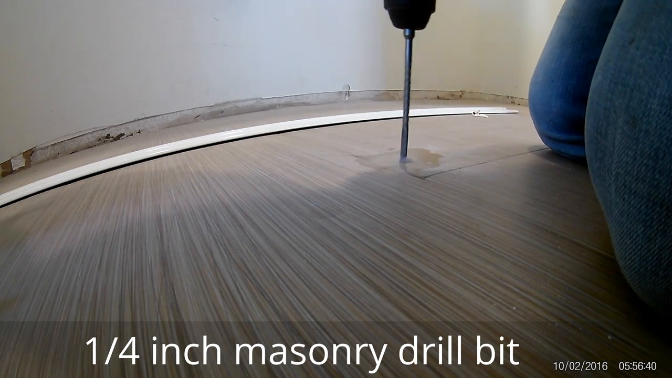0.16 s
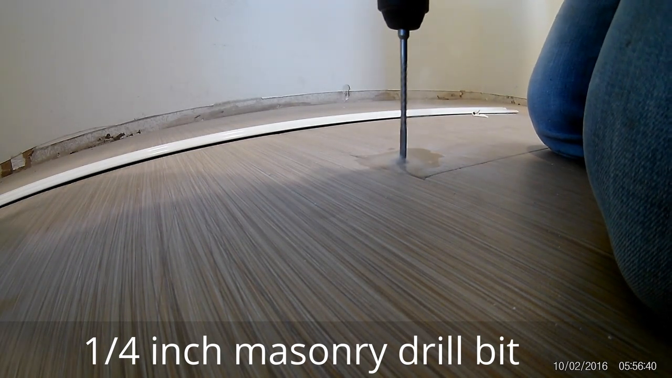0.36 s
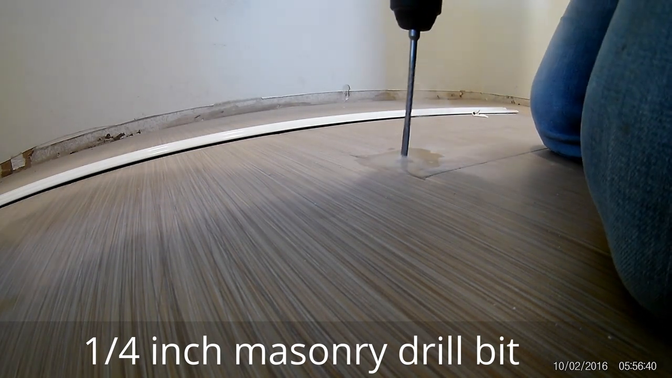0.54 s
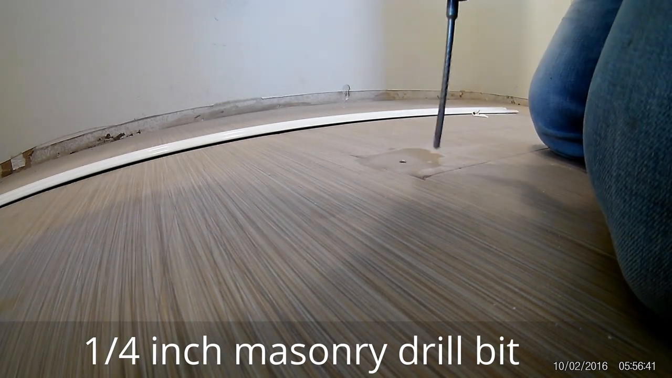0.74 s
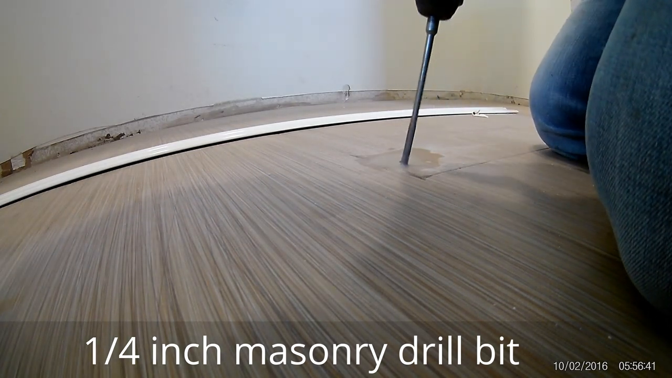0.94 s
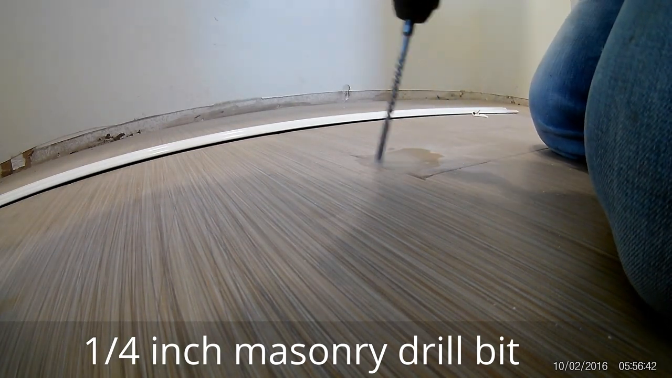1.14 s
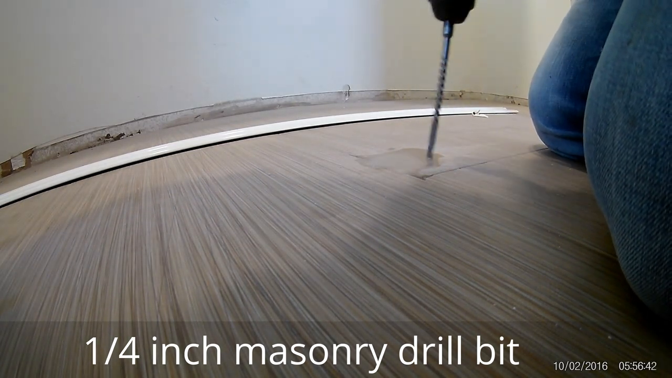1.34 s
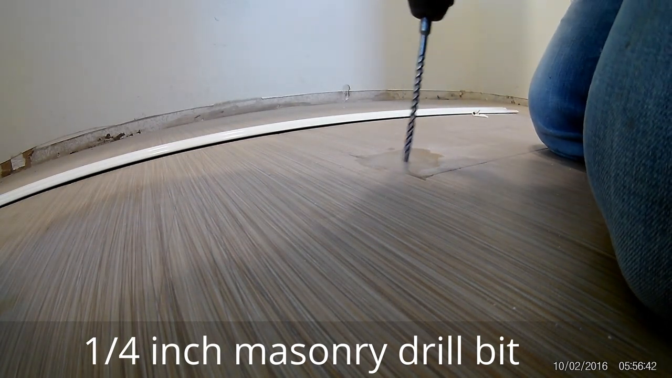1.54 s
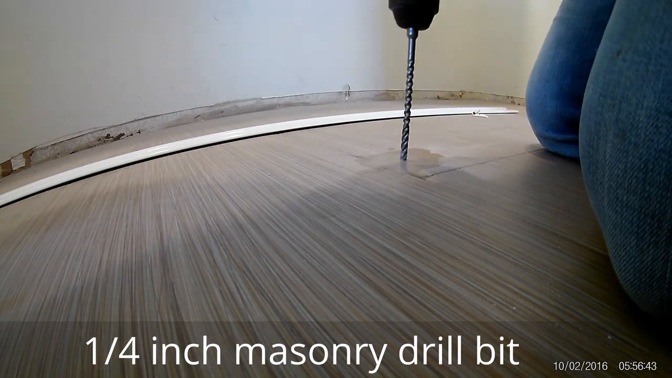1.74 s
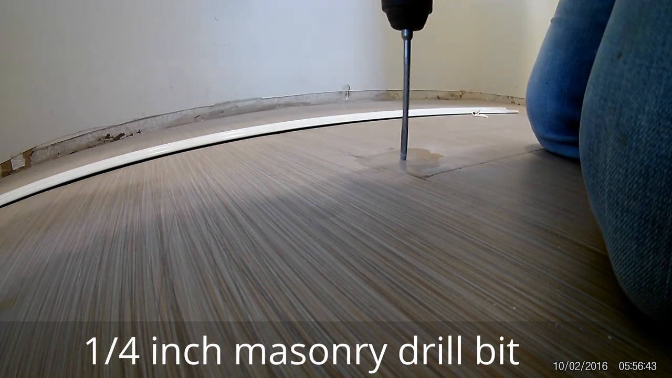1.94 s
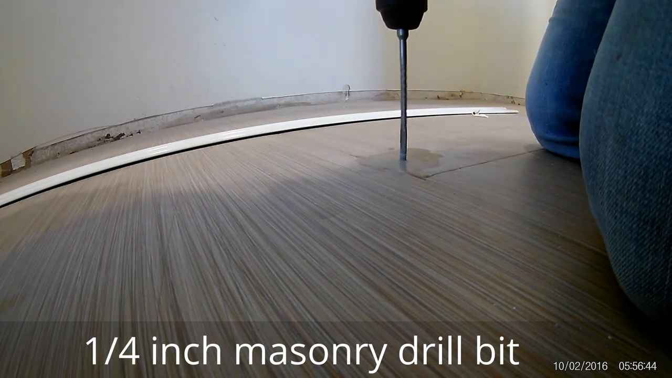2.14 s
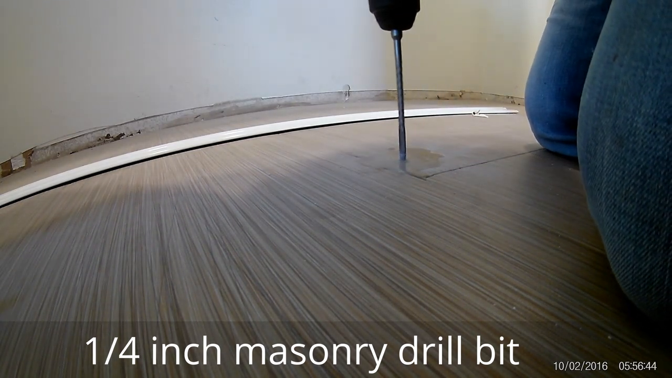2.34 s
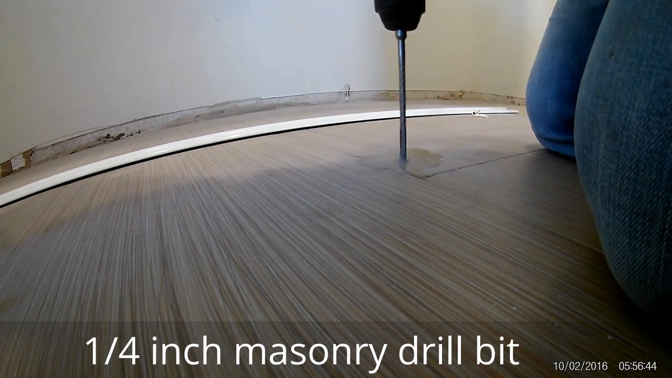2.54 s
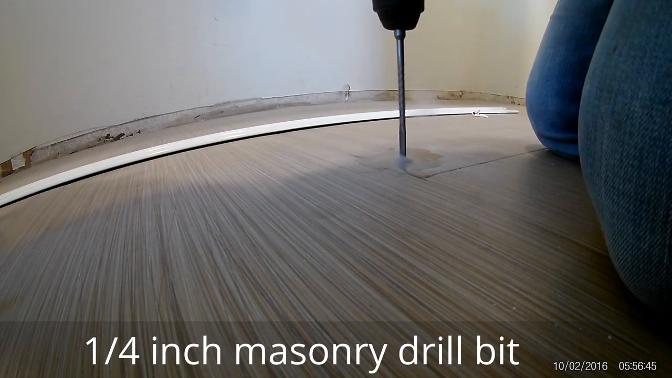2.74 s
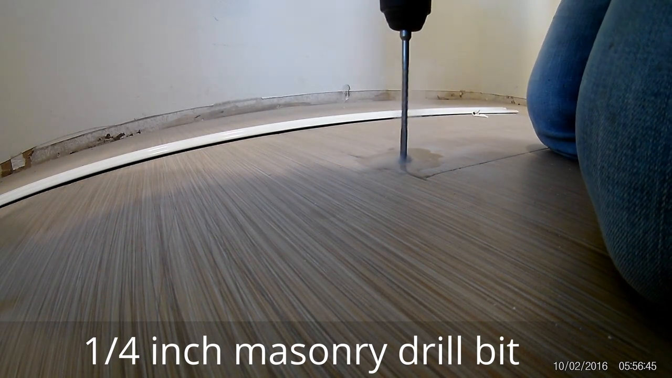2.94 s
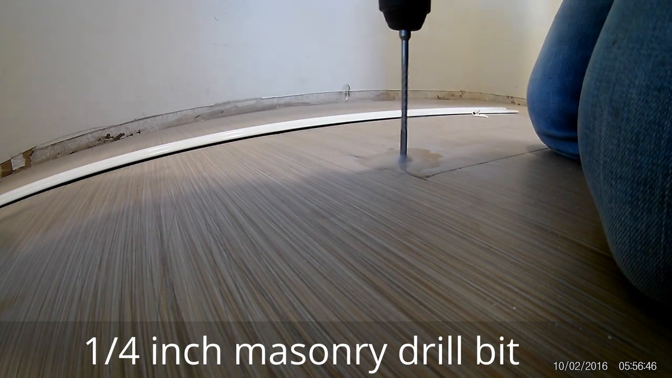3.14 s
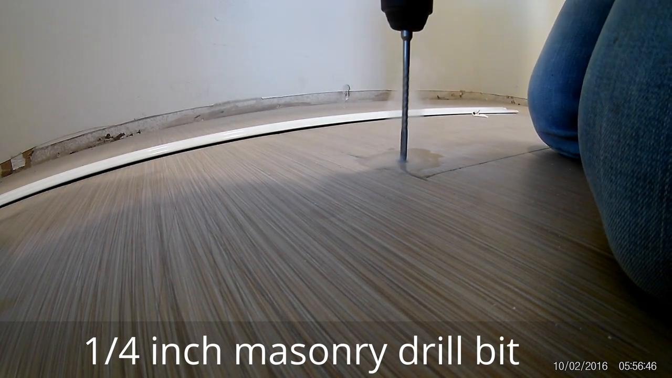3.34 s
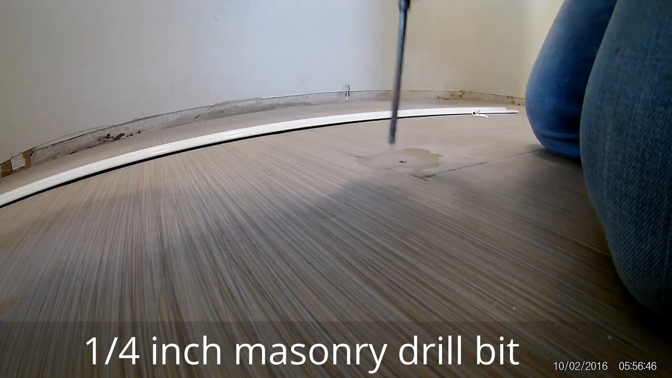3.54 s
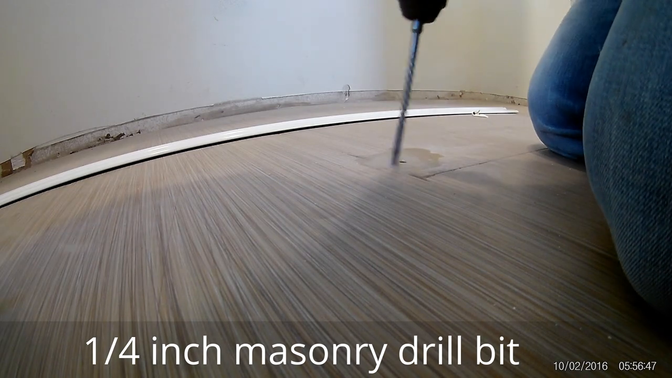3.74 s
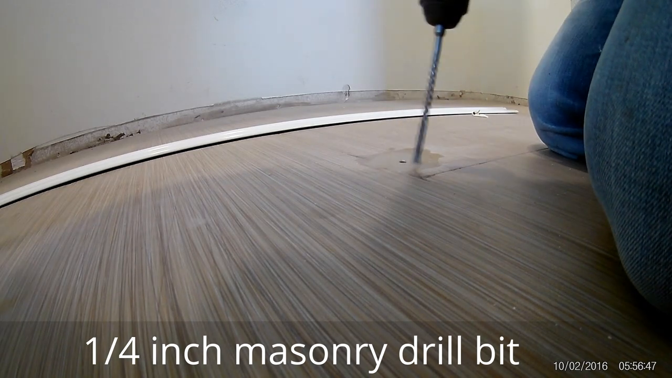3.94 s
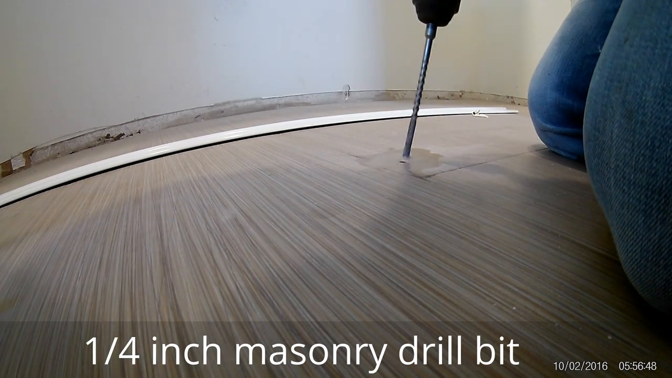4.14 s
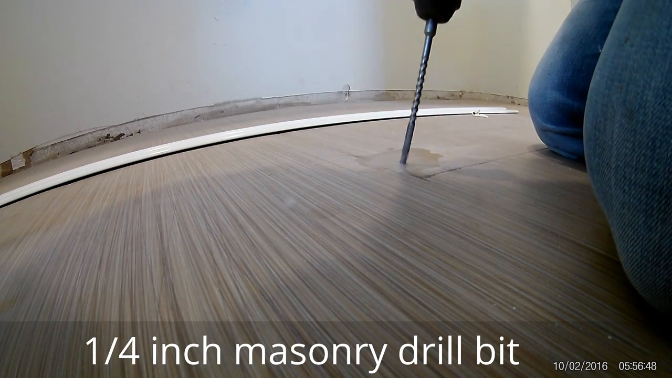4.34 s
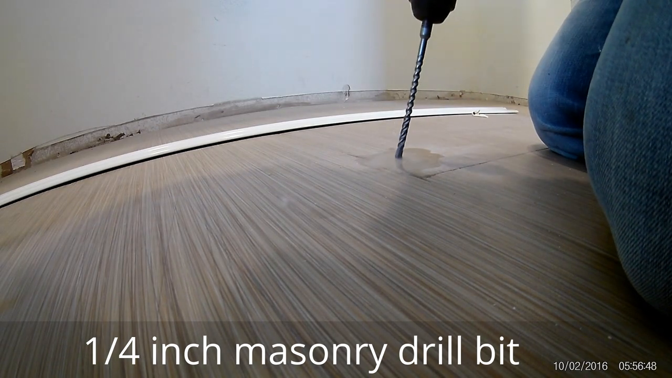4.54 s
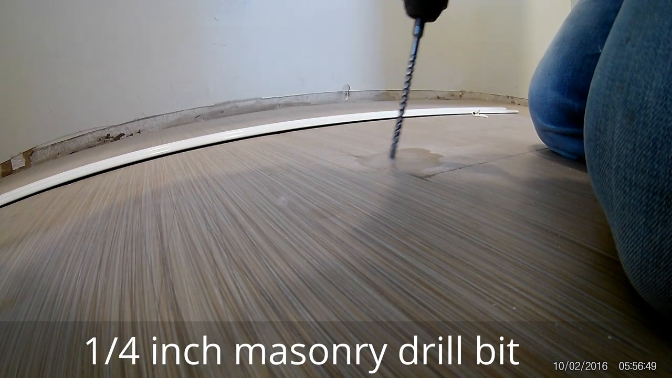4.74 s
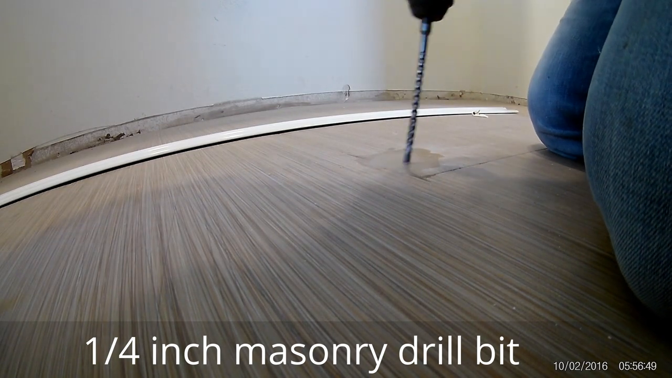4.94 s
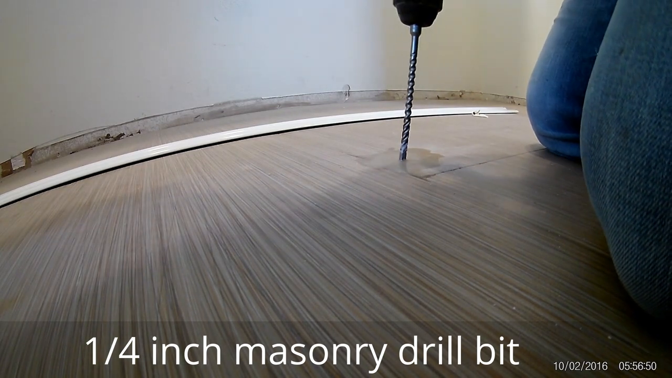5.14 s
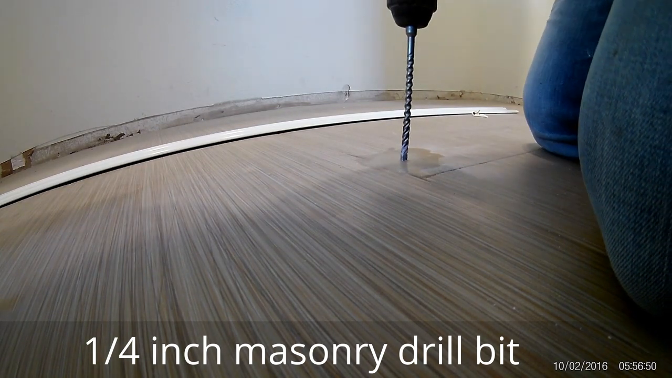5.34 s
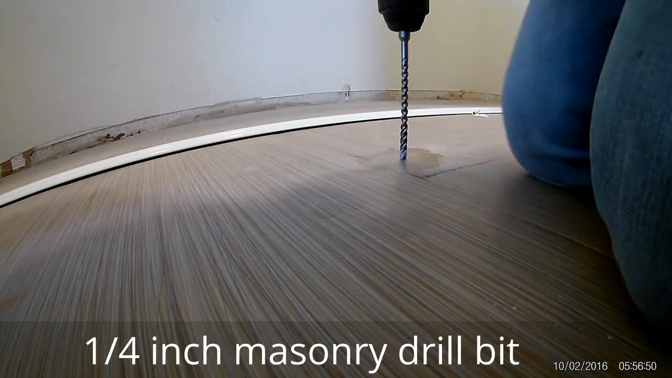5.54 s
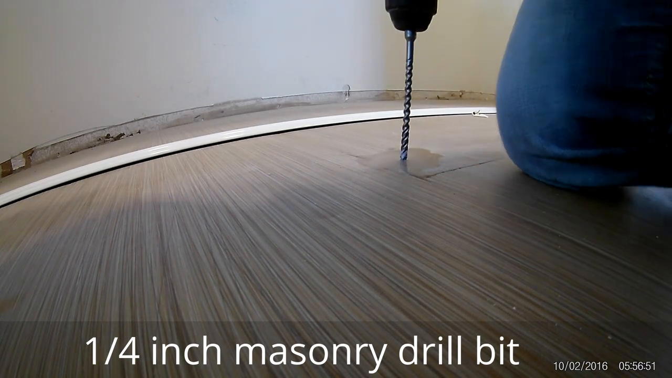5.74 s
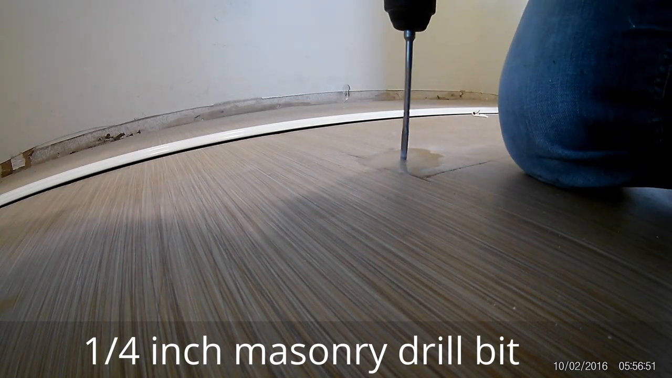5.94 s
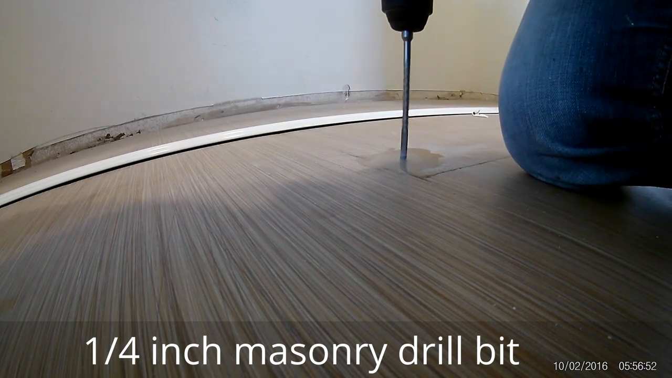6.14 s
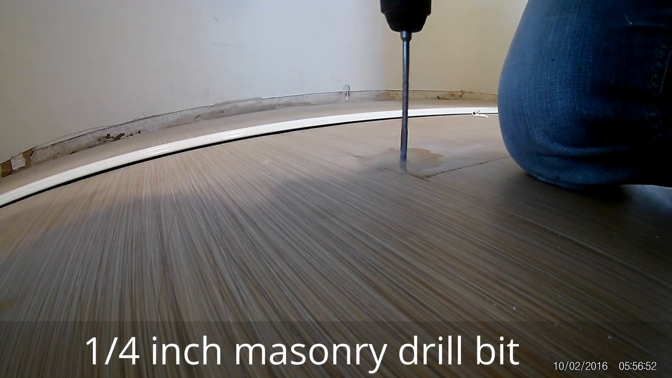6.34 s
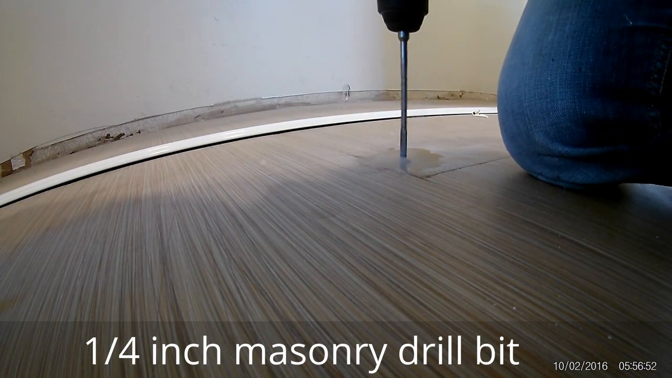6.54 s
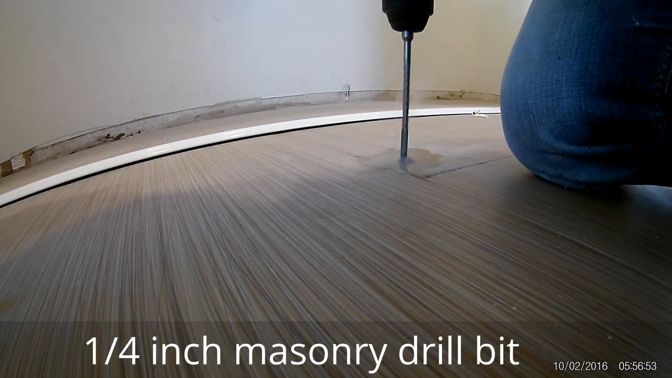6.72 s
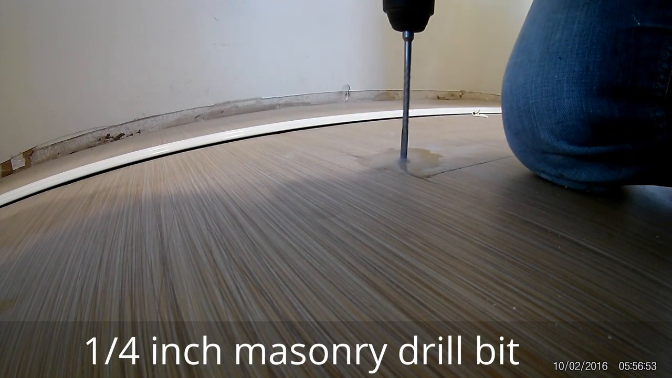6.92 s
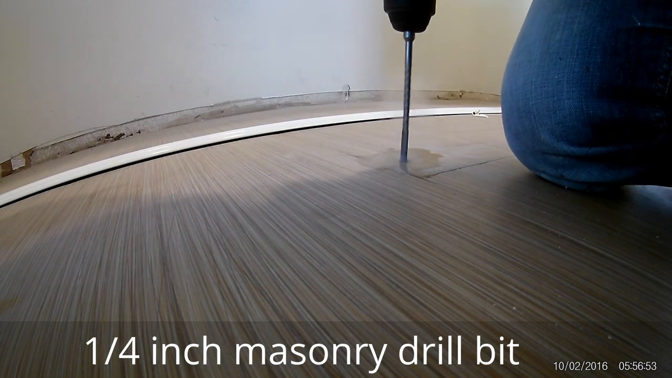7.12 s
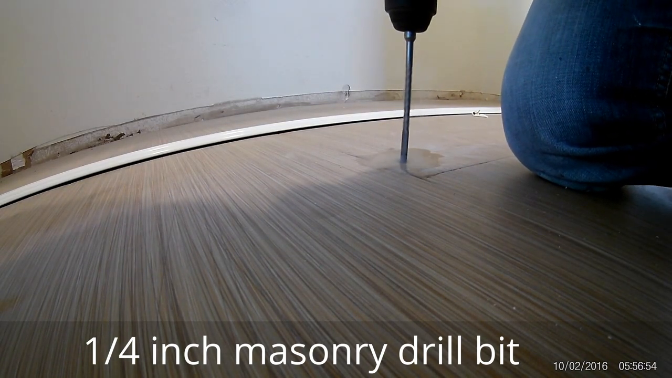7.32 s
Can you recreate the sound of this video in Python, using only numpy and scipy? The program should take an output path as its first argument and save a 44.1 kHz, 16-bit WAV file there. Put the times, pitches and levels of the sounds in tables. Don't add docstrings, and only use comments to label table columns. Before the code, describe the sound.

Three bursts of masonry drilling on hard tile, heard close from floor level in a bare room. Each burst is a harsh, steady whine over rapid buzzing and crushed grit. Between them the motor sinks in pitch with a faint fan whistle, while the freed bit drags, clacks and knocks on the tile. The last burst is heaviest and continues to the end.

```python
import sys
import numpy as np
from scipy import signal
from scipy.fft import rfft, irfft
from scipy.io import wavfile

SR = 44100
rng = np.random.default_rng(int(sys.argv[2]) if len(sys.argv) > 2 else 0)


def natural_amplitude(level_db):
    exponent = np.asarray(level_db, float) / 20
    return 10 ** exponent


def generate_wav(sig):
    pcm = np.round(np.clip(np.atleast_2d(sig).T, -1, 1) * 32767).astype(np.int16)
    wavfile.write(sys.argv[1], SR, pcm)


N = 325444
MESH_PER_BITE = 43.37
RUN_HZ = 4350


def rms_one(x):
    return x / np.sqrt(np.mean(x ** 2) + 1e-20)


def in_time(rows):
    s, *columns = np.transpose(rows)
    return [np.interp(np.arange(N) / SR, s, c) for c in columns]


def at_speed(rows, hz):
    speed, *columns = np.transpose(rows)
    return [np.interp(hz, speed, c) for c in columns]


def drift(rate_hz):
    knots = rng.standard_normal(int(N / SR * 40) + 2)
    r = np.exp(-2 * np.pi * min(rate_hz, 15) / 40)
    smooth = rms_one(signal.lfilter([1], [1, -r], knots))
    return np.interp(np.arange(N) / SR * 40, np.arange(len(knots)), smooth)


def swell_db(hz, centre_hz, half_width_hz, db):
    return db / (1 + ((hz - centre_hz) / half_width_hz) ** 2)


def colour(x, spectrum, peaks=()):
    hz = np.maximum(np.fft.rfftfreq(N, 1 / SR), 1)
    curve_hz, curve_db = np.transpose(spectrum)
    gain = natural_amplitude(np.interp(np.log(hz), np.log(curve_hz), curve_db, left=-90, right=-90))
    for top_hz, width_hz, db in peaks:
        gain = gain * natural_amplitude(swell_db(hz, top_hz, width_hz / 2, db))
    return rms_one(irfft(rfft(x) * gain, N))


def band(x, low_hz, high_hz):
    return signal.sosfilt(signal.butter(3, [low_hz, high_hz], "band", fs=SR, output="sos"), x)


def ring(clicks, hz, t60):
    r, w = natural_amplitude(-60 / (t60 * SR)), 2 * np.pi * hz / SR
    return signal.lfilter([0, np.sin(w)], [1, -2 * r * np.cos(w), r * r], clicks + 1e-18)


# start_s, gear_mesh_hz, floor_weight_db, sideways_lean_db, tip_push_db
BURSTS = [
    [(0.0, 4370, -42, -18, -25), (0.224, 4400, -37, -22.5, -28), (0.406, 4372, -53, -31.5, -33),
     (0.474, 4330, -56, -20, -29), (0.562, 4340, -39, -17, -28), (0.58, 4270, -41, -29, -38)],
    [(1.95, 2704, -52, -44, -32), (2.068, 4150, -52, -20, -37), (2.18, 4430, -38, -25, -27),
     (2.272, 4500, -37, -17, -26), (2.604, 4387, -28, -26, -30), (2.868, 4290, -30, -31, -27),
     (3.02, 4322, -27, -30, -28), (3.16, 4264, -29, -19, -25), (3.495, 4210, -29, -21, -25)],
    [(5.896, 2950, -50, -50, -28), (5.988, 3947, -28, -21, -21), (6.088, 3365, -29, -37, -27),
     (6.222, 4290, -27, -23, -34), (6.39, 4490, -22, -19, -21), (6.66, 4440, -23, -18, -23),
     (6.85, 4362, -25, -30, -17), (6.964, 4360, -27, -17, -17.5), (7.38, 4343, -28, -23, -17)],
]
PRESS_S = [
    1.893,
    5.825,
]


def motor():
    t, hz = np.arange(N) / SR, in_time(sum(BURSTS, []))[0]
    coast_s, drag_hz = 1.2, 1700
    load_rows = [(0, 1)]
    for held, press, after in zip(BURSTS, PRESS_S, BURSTS[1:]):
        release, top_hz = held[-1][:2]
        up, up_hz = after[0][:2]

        def coast(s):
            return np.maximum((top_hz + drag_hz) * np.exp((release - s) / coast_s) - drag_hz, 1)

        off = (t > release) & (t < up)
        climb = np.interp(t[off], [press, up], [max(coast(press), 300), up_hz])
        hz[off] = np.where(t[off] < press, coast(t[off]), climb)
        load_rows += [(release, 1), (release + .05, 0), (press, 0), (press + .02, 1)]
    return 2 * np.pi * np.cumsum(hz) / SR, hz, in_time(load_rows)[0]


def driven(hz, load):
    return np.sqrt(2) * load ** 2 * natural_amplitude(-40 * np.clip(1 - hz / 2900, 0, 1))


def second_order_db():
    seated_db = -42
    rows = []
    for s in PRESS_S:
        rows += [(s, -50), (s + .12, -30), (s + .9, seated_db)]
    for held in BURSTS[:-1]:
        rows += [(held[-1][0] - .1, seated_db), (held[-1][0] + .02, -29)]
    return in_time(sorted(rows))[0] + 3.0 * drift(5)


# start_s, rise_s, level_db
UNEVEN = [
    (.1, .35, -36),
    (2.5, .4, -36),
    (5.9, 1.1, -39),
]


def uneven_db():
    rows = []
    for s, rise, db in UNEVEN:
        rows += [(s, -54), (s + rise, db), (s + rise + .7, db - 3)]
    return in_time(rows)[0]


# multiple_of_bite, level_db
UPPER_ORDERS = [(5, -5), (6, -5.5), (7, -2.5), (8, -1), (9, -9.5), (10, -9.5), (11, -6), (12, -23),
                (13, -29), (14, -20), (15, -6), (16, -39), (19, -10), (20, -5)]


def bites(mesh, hz, load):
    _, weight_db, lean_db, push_db = in_time(sum(BURSTS, []))
    bite, bite_hz = mesh / MESH_PER_BITE, hz / MESH_PER_BITE
    fourth_db = (lean_db + push_db) / 2 - 4.5 + 2.2 * drift(5)
    fourth_db += swell_db(4 * bite_hz, 408, 11, 8) + swell_db(4 * bite_hz, 320, 22, 13)
    orders = [(1, weight_db), (2, second_order_db()), (3, lean_db + 1.5 * drift(6)), (4, fourth_db)]
    orders += [(1.5, uneven_db())]
    for k, db in UPPER_ORDERS:
        boom_db = swell_db(k * bite_hz, 740, 70, 11) + swell_db(k * bite_hz, 415, 30, 12) - 7
        orders.append((k, push_db + db + 4.35 * drift(13) + boom_db))
    out = 0
    for k, db in orders:
        angle = bite + 0.087 * drift(8.5)
        out = out + natural_amplitude(db) * np.sin(k * angle + rng.uniform(0, 7.3))
    return driven(hz, load) * out


# multiple_of_mesh, level_db
GEAR_ORDERS = [(1 / 5, -1), (1, 0), (13 / 12, -16), (14 / 12, -14), (6 / 5, -17), (15 / 12, -14),
               (17 / 12, -22), (2, -21)]


def gear_whine(mesh, hz, load):
    push_db = in_time(sum(BURSTS, []))[3]
    case_db = -32 + swell_db(hz, 4378, 75, 11)
    side_db = -22 + 40 * np.log10(hz / RUN_HZ)
    out = 0
    for k, db in GEAR_ORDERS:
        level_db = case_db if k <= 1 else side_db
        if k < 1:
            level_db = level_db + .45 * (push_db + 22)
        out = out + natural_amplitude(level_db + db + 2.4 * drift(7)) * np.sin(k * mesh + 0.053 * drift(4.3))
    return driven(hz, load) * out


# level_db, slope_db_per_db_of_speed
POWERED = [
    (-21.5, 1.2),
    (-14, 1.2),
    (-24, 1.6),
]
# gear_mesh_hz, floor_drumming_db, grind_db, hiss_db
IDLING = [(0, -62, -62, -78), (250, -52, -50, -70), (500, -50, -43, -55), (750, -49, -36, -49),
          (1300, -42, -29.5, -43), (2200, -39, -26.5, -37.5), (3200, -37, -22, -32.5),
          (4200, -33, -18, -27.5)]
# start_s, hold_s, grind_db, floor_drumming_db, hiss_db
SCUFFS = [(1.1, .015, -25, -31, -52), (1.135, .01, -21.5, -29, -50), (1.29, .07, -31, -41, -52),
          (1.19, .01, -24, -32, -50), (1.405, .015, -25, -33, -52), (1.5, .07, -33, -38, -55),
          (1.6, .015, -29, -35, -55), (1.698, .01, -33, -19, -52), (1.72, .01, -23, -21, -44),
          (1.77, .04, -42, -27, -56), (3.745, .01, -18, -24, -45), (3.83, .15, -27, -32, -48),
          (4.15, .06, -27, -32, -48), (4.53, .01, -27, -41, -52), (4.58, .08, -30, -35, -55),
          (4.72, .005, -35, -45, -56), (4.795, .05, -38, -47, -67), (4.92, .06, -21.5, -30, -49),
          (5.062, .015, -26, -34, -47), (5.236, .005, -36, -21, -55), (5.3, .06, -46, -34, -64),
          (5.45, .1, -45, -59, -72), (5.615, .01, -49, -58, -52), (5.74, .04, -52, -54, -65)]


def contact(hz, load):
    t = np.arange(N) / SR
    speed_db = 20 * np.log10(hz / RUN_HZ)
    power = []
    for (db, slope), idle_db in zip(POWERED, at_speed(IDLING, hz)):
        power.append(natural_amplitude(load * (db + slope * speed_db) + (1 - load) * idle_db) ** 2)
    for s, hold, grind_db, drum_db, hiss_db in SCUFFS:
        near = slice(round((s - .1) * SR), round((s + hold + .2) * SR))
        rise_db, fall_db = 700 * (t[near] - s), 320 * (s + hold - t[near])
        shape = natural_amplitude(np.minimum(np.minimum(rise_db, fall_db), 0))
        for layer, db in zip(power, (drum_db, grind_db, hiss_db)):
            layer[near] += (natural_amplitude(db) * shape) ** 2
    return [10 * np.log10(layer) for layer in power]


# pitch_hz, level_db (per Hz)
DRUMMING = [(71, -49), (120, -17), (222, -16), (317, -4.5), (611, -7), (779, -10), (993, -3.5),
            (1310, -1.5), (1500, 0), (1950, -33), (3300, -120)]
# pitch_hz, level_db (per Hz)
GRIND = [(710, -33), (1200, -5.5), (1550, -9), (1700, 0), (1840, -2.5), (2170, -1.5), (2720, -4),
         (3210, -5.5), (3980, -12.5), (5000, -26.5), (6500, -19.5), (11000, -120)]
# pitch_hz, level_db (per Hz)
HISS = [(2710, -21), (4600, 1.5), (5160, 1.5), (6200, -6), (7380, 1.5), (8960, 0.5), (11200, -6.5),
        (12800, -7.5), (13600, -15), (15100, -21)]
# pitch_hz, width_hz, lift_db
BODY = [(413.4, 13, 11.5), (744, 158, 16), (1300, 27, 1), (1657, 43, 7), (1990, 220, 4.5), (2590, 99, 2.5),
        (4350, 57, 5), (5050, 68, 4), (8650, 400, 1.5)]


def grinding(mesh, hz, load):
    drum_db, grind_db, hiss_db = contact(hz, load)
    swell = natural_amplitude(0.6 * load * np.cos(mesh / MESH_PER_BITE) + 0.9 * (0.5 - load) * drift(5))
    born = rng.random(N) < 700 * natural_amplitude(4 * drift(12)) / SR
    sizes = natural_amplitude(3.14 * np.minimum(rng.exponential(1, N), 2.8))
    grains = rms_one(born * sizes * rng.choice([-1, 1], N))
    turns = np.floor(mesh / MESH_PER_BITE / (2 * np.pi) + .06 * drift(15))
    blows = rms_one((np.diff(turns, prepend=0) > 0) * natural_amplitude(1.3 * rng.standard_normal(N)))
    chips = rms_one(signal.lfilter([1], [1, -.985], blows) * rng.standard_normal(N))
    rough = (1.2 - 0.48 * load) * grains + .7 * load * chips
    out = 0
    for level_db, spectrum, grit in ((drum_db + 1, DRUMMING, .4), (grind_db, GRIND, .6), (hiss_db, HISS, .3)):
        force = rng.standard_normal(N) + grit * rough
        out = out + natural_amplitude(level_db) * colour(force, spectrum, BODY)
    dull = signal.lfilter(*signal.butter(1, 15000, fs=SR), out)
    out = load * out + (1 - load) * dull
    shank = 0
    for mode_hz, db in ((4510, -20.5), (2000, -21), (1444, -13)):
        shank = shank + rms_one(ring(grains, mode_hz, 0.041)) * natural_amplitude(db)
    return (out + (1 - load) * natural_amplitude(grind_db) * shank) * swell


# pitch_hz, level_db (per Hz)
ROOM_TONE = [(15, -38), (25, -5), (84, 1.5), (375, -12), (571, -6), (630, -29), (1320, -72), (2970, -14),
             (3360, -13), (9000, -59), (11700, -71), (19800, -120)]


def room_tone():
    return natural_amplitude(-50) * colour(rng.standard_normal(N), ROOM_TONE)


# gear_mesh_hz, shaft_tone_db, fan_whistle_db
COAST_TONES = [(250, -99, -99), (1150, -58, -50), (1880, -57, -49), (2050, -40, -50), (2600, -43, -52),
               (3300, -39, -55), (3800, -28, -59), (4200, -34, -60)]
# multiple_of_mesh, level_db
FAN_ORDERS = [(3, -2.5), (4.6, -7), (6, -15), (7.5, -18)]


def coasting(mesh, hz, load):
    shaft_db, fan_db = at_speed(COAST_TONES, hz)
    fan = 0
    for k, db in FAN_ORDERS:
        fan = fan + natural_amplitude(db + 4.0 * drift(7.96)) * np.sin(k * (mesh + .3 * drift(15)))
    in_range = np.gradient(mesh) * 7.6 < np.pi
    shaft = natural_amplitude(shaft_db + 2.5 * drift(12)) * np.sin(mesh / 5)
    return np.sqrt(2) * (1 - load) * (shaft + in_range * natural_amplitude(fan_db) * fan)


# start_s, peak_db, low_thump_db, floor_knock_db, tile_pitch_hz
TAPS = [(1.683, -10.5, -21, -18, 1990), (1.693, -16, -24, -1.5, 1170), (1.708, -9, -33, -43, 710),
        (1.722, -16, -31, -11, 791), (1.748, -15.5, -31, -7, 794), (1.783, -5.5, -32, -25, 1960),
        (5.199, -7.5, -21, -14, 2000), (5.232, -10, -20, -24, 1220), (5.305, -9, -15, -12, 762),
        (5.397, -22, -30, -30, 1780), (5.4, -1, -17, -10, 1780), (5.406, -6, -20, -8, 700),
        (5.543, -33, 4, -20, 1290), (5.727, -25.5, 5.5, 2, 1885)]
# start_s, peak_db, steel_tick_db, tile_pitch_hz
CLACKS = [(1.603, -16.5, -20, 1730), (3.754, -6.5, -23, 1720), (3.975, -9.5, -21, 2075),
          (4.213, -9, -15, 670), (4.298, -20, -21, 1310), (4.517, -13, -24, 1960), (4.597, -20, -23, 2020),
          (4.711, -19, -19, 1910), (4.788, -22, -13, 2000), (4.883, -25, -20, 2000),
          (4.912, -13, -23, 2000), (4.966, -10, -29, 2030), (5.83, -18, -8, 713), (5.87, -13, -5, 2210)]
# pitch_hz, level_db, t60_s
THUMP_MODES = [(75, -6, 0.14), (92, -2, 0.12), (142, 4.5, 0.14)]
# pitch_hz, level_db, t60_s
STEEL_MODES = [(4470, -3, .03), (5150, 0, .025), (7600, -6, .015)]


def taps():
    out, t = np.zeros(N + SR), np.arange(SR // 2) / SR

    def die(db, t60):
        return natural_amplitude(db - 60 * t / t60)

    rows = [(s, db, thump_db, knock_db, -45 - db, hz) for s, db, thump_db, knock_db, hz in TAPS]
    rows += [(s, db, -36, -24, tick_db, hz) for s, db, tick_db, hz in CLACKS]
    rough = rng.standard_normal((len(rows), len(t)))
    lows, mids = band(rough, 240, 430), band(rough, 400, 2400)
    uppers, highs = band(rough[::-1], 2200, 4000), band(rough, 4000, 11000)
    push = natural_amplitude(-43) * np.sin(np.pi * np.minimum(t / 0.0066, 1)) ** 2
    thump = sum(natural_amplitude(d) * ring(push, hz, r) for hz, d, r in THUMP_MODES)
    for row, noise, low, mid, upper, high in zip(rows, rough, lows, mids, uppers, highs):
        s, db, thump_db, knock_db, tick_db, tile_hz = row
        touch = noise * die(-16, .008)
        hit = mid * (die(-0.5, 0.042) + die(-10, 0.17))
        bright_db = np.clip(.8 * (db + 5), -4, 2.5)
        hit += upper * natural_amplitude(bright_db) * (die(-3, 0.019) + die(-18.5, 0.14))
        hit += natural_amplitude(-6) * ring(touch, tile_hz, .02)
        steel = sum(natural_amplitude(d - 3) * ring(touch, hz, r) for hz, d, r in STEEL_MODES)
        hit += natural_amplitude(tick_db) * (high * die(-5, .015) + steel)
        hit += natural_amplitude(knock_db + 21.5) * low * die(0, 0.12)
        hit += natural_amplitude(thump_db) * thump
        start = round(s * SR)
        out[start:start + len(t)] += natural_amplitude(db) * hit
    return signal.sosfilt(signal.butter(5, 62, "high", fs=SR, output="sos"), out[:N])


def room(x, t60=0.32):
    t = np.arange(SR // 2) / SR
    echoes = signal.lfilter([1], [1, -.8], rng.standard_normal(len(t)))
    tail = echoes * natural_amplitude(-60 * t / t60) * (t > .004)
    return signal.fftconvolve(x, tail / np.sqrt(np.sum(tail ** 2)))[:N]


def scene():
    mesh, hz, load = motor()
    drill = bites(mesh, hz, load) + gear_whine(mesh, hz, load) + grinding(mesh, hz, load)
    drill = drill + coasting(mesh, hz, load)
    knocks = taps()
    return (drill + room_tone() + knocks + natural_amplitude(-14) * room(knocks))[None]


def low_pass(x):
    return signal.sosfilt(signal.butter(12, 15260, fs=SR, output="sos"), x)


def record(dry):
    cut = signal.sosfilt(signal.cheby2(10, 30, 15350, fs=SR, output="sos"), dry)
    mix = np.clip(1.303 * np.tanh(cut / 1.32), -.99, .99)
    return low_pass(mix)


dry = scene()
out = record(dry)
generate_wav(out)
```